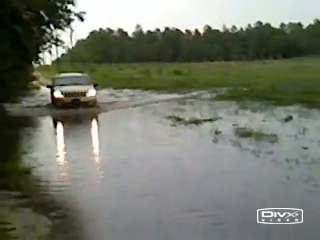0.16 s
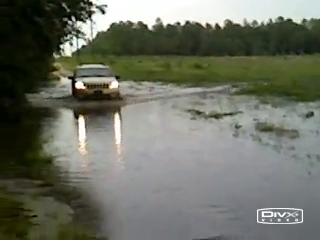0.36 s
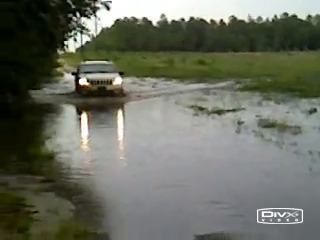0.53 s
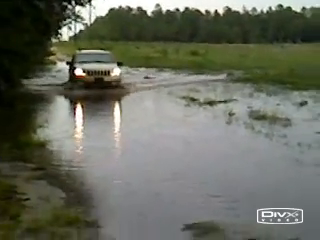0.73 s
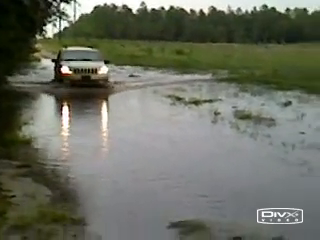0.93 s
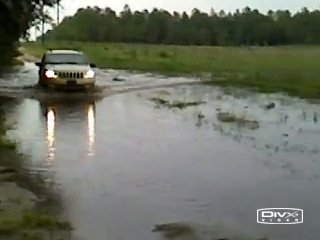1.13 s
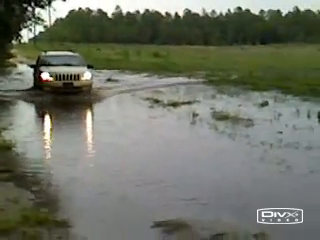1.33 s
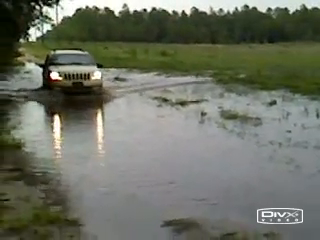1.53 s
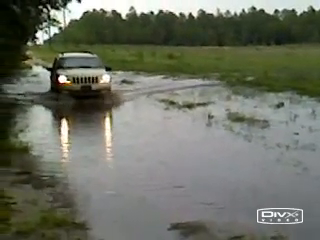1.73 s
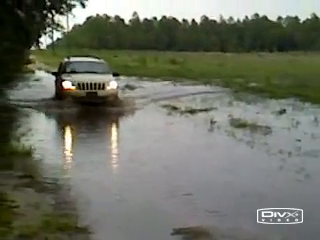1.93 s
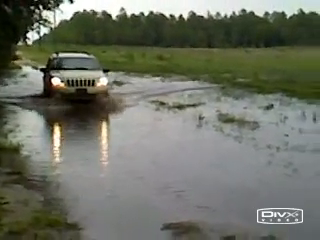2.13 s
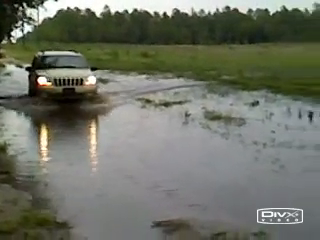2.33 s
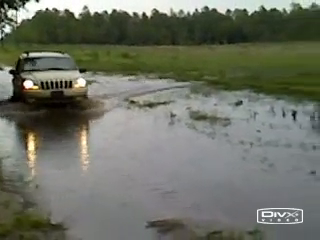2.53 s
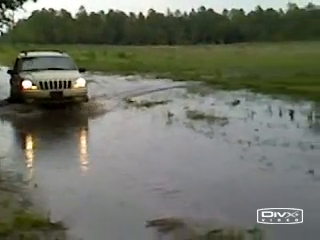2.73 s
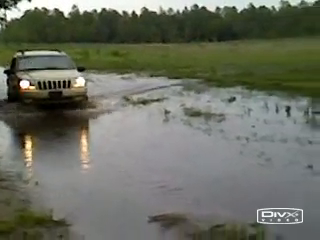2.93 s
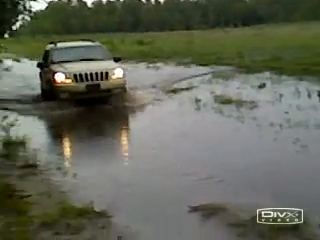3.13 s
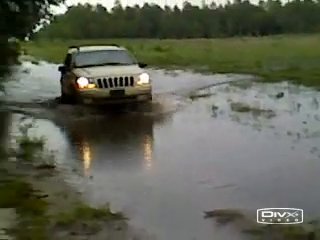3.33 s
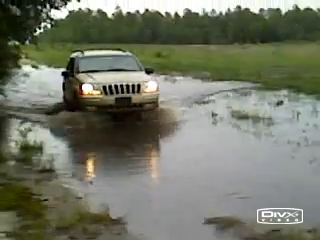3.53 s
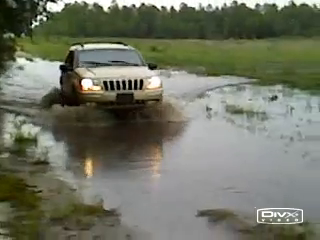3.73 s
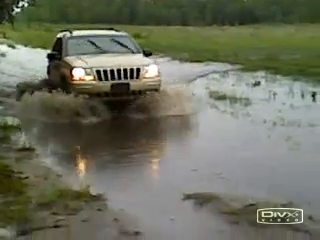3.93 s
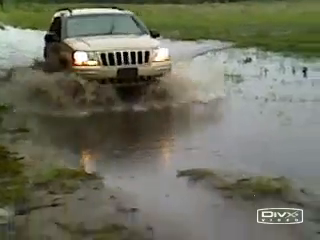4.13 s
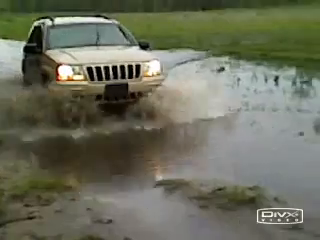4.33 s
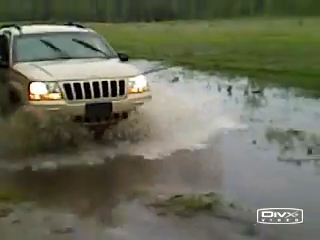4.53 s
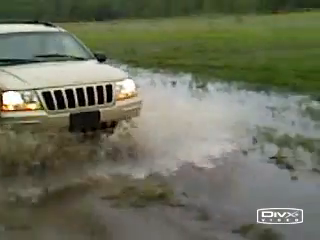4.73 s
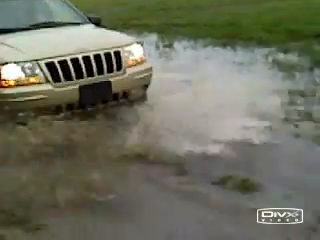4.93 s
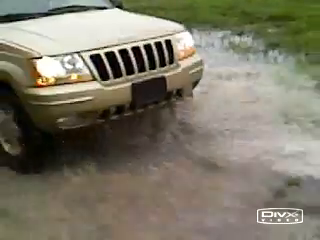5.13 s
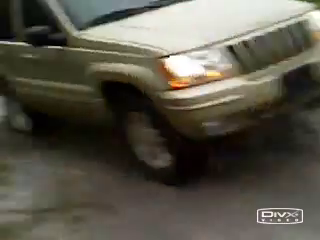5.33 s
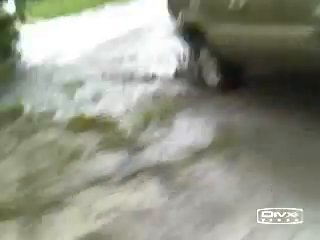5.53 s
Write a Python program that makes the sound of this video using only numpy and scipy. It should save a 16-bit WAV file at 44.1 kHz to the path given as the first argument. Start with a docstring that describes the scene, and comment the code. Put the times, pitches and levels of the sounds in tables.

```python
"""A flooded dirt road: a heavy car wades toward a small camera and passes close by.
Rush, slosh and spray are noise washes with random patches and flicker, each with its own ringing bubbles.
Thrown sheets land as bursts of crackle, air pockets plop as gliding tones, the engine is lumpy low noise.
The camera keeps a narrow band and holds each sample as a step, which mirrors the sound into the treble."""
import sys
import numpy as np
from scipy import signal
from scipy.io import wavfile
from scipy.ndimage import uniform_filter1d, map_coordinates

SR = 44100
rng = np.random.default_rng(int(sys.argv[2]) if len(sys.argv) > 2 else 0)


def transcribe(signal):
    """Save signal, clipped to [-1, 1], as a 16-bit WAV file at the path in sys.argv[1]."""
    frames = np.atleast_2d(signal).T
    limited = np.clip(frames, -1, 1)
    pcm = np.round(limited * 32767).astype(np.int16)
    wavfile.write(sys.argv[1], SR, pcm)


N = 245637

# Slow levels of the approach: (time [s], bow-wave rush [dB], slosh under the body [dB],
# falling spray [dB], engine rumble [dB])
APPROACH = [(0.0, -42.5, -50, -50.5, -70), (0.7, -44, -47.5, -45.5, -67), (1.35, -41, -47.5, -44, -63.5),
            (2.0, -43.5, -50, -42, -63), (2.6, -41.5, -49, -41.5, -64), (3.15, -40.5, -48.5, -42.5, -64),
            (3.45, -39.5, -41.5, -41.5, -57), (3.75, -36.5, -37, -36, -51), (4.08, -32, -33.5, -36, -51),
            (4.35, -33.5, -35.5, -31.5, -51.5), (4.55, -34, -38, -31.5, -51), (4.75, -33, -38, -31.5, -51),
            (4.95, -30.5, -36, -32, -48.5), (5.15, -32.5, -37.5, -27.5, -52),
            (5.35, -32.5, -38, -30.5, -52.5), (5.57, -32, -40, -27, -61)]
# Brief swells and dips in level: (time [s], rush [dB], slosh [dB], spray [dB], rumble [dB])
SWELLS_AND_DIPS = [(1.68, -5, 3.5, -1, 6), (3.04, -4, 2, 2.5, -4), (3.38, -0.5, -0.5, 1.5, 3),
                   (3.79, -0.5, 3, 0, -3), (4.1, -1, 0, 2, 0), (4.37, 3, -0.5, 0, 1), (4.63, 2, 1, 0, 5),
                   (4.94, -1, 4, 1.5, 6), (5.12, 0.5, 4, 1, 1), (5.29, 0.5, 9, 4, 7.5),
                   (5.518, 2, 3, -3.5, 2)]
# Closeness of the car: (time [s], nearness [0 far - 1 close])
CLOSENESS = [(0, .02), (3.2, 0.38), (3.7, 0.24), (5.0, 1), (5.57, 0.87)]
# Tone of the slosh: (time [s], depth [0 shallow - 1 deep])
SLOSH_DEPTH = [(0, .3), (1.0, .1), (3.0, 0.081), (3.6, 1), (4.3, 0.85), (5.0, 0.58), (5.57, 1)]
# Spectrum of the bow wave: (frequency [Hz], far density [dB per Hz], close density [dB per Hz])
RUSH_SPECTRUM = [(480, -24, -28), (796, -15.5, -7), (1013, -6.5, -2), (1130, -4, 0.5), (1330, 0, -2),
                 (1390, -4, 0.5), (1550, -7.5, -4.5), (1780, -11.5, -5), (2350, -21, -18.5)]
# Spectrum of water under the body: (frequency [Hz], shallow density [dB per Hz], deep density [dB per Hz])
SLOSH_SPECTRUM = [(60, -42, -34), (152, -14.5, -10.5), (230, -15.5, -6), (337, -8, 1.5), (550, -2, -1),
                  (588, -5.5, 0), (900, -29.5, -14)]
# Spectrum of falling spray, fuller close by: (frequency [Hz], far density [dB per Hz], close density [dB per Hz])
SPRAY_SPECTRUM = [(100, -42, -13), (300, -31, -13), (700, -4.5, -2), (1500, -1.5, -10.5), (1940, -5.5, 2),
                  (2160, -1, -4), (2680, 0, 1), (3000, -11, 1.5), (3615, -2.5, -3), (3900, -15, -6)]
# Sheets of thrown water landing: (time [s], level [dB], t60 [s], lowest frequency [Hz], highest frequency [Hz])
WATER_SHEETS = [(.29, -42.5, 0.44, 1500, 3280), (1.65, -34, 0.35, 700, 2350), (1.69, -37.5, 0.5, 202, 1200),
                (2.3, -37, 0.2, 700, 2800), (3.02, -36, 0.24, 400, 2000), (3.8, -38, 0.35, 900, 3000),
                (4.61, -29, 0.85, 300, 2500), (4.87, -30, .3, 1500, 3530), (5.295, -30, 0.48, 250, 3300),
                (5.421, -29, 0.3, 900, 3370)]
# Large air pockets ringing as they burst: (time [s], pitch [Hz], level [dB], glide [share of pitch])
AIR_POCKETS = [(1.411, 490, -42, -0.031), (1.683, 252, -44, .01), (3.493, 1382, -36.5, 0.044),
               (3.77, 205, -39, .05), (3.812, 1434, -29.5, .07), (3.918, 350, -34, -0.012),
               (4.032, 475, -29, 0.0057), (4.103, 442, -34, 0.069), (4.366, 1404, -30.5, 0.029),
               (4.415, 340, -31, 0.041), (4.44, 1340, -31, -0.053), (4.618, 1380, -32, -0.021),
               (4.646, 315, -32, .02), (4.75, 324, -35, 0.043), (4.863, 600, -33, -0.22),
               (4.865, 300, -35, 0.042), (5.032, 230, -34, -0.32), (5.092, 370, -36, 0.0075),
               (5.149, 390, -34, -0.073), (5.258, 367, -32, -.05), (5.285, 2454, -30, -.02),
               (5.343, 1134, -32.5, 0.071), (5.375, 2120, -35, 0.11), (5.415, 1190, -38, -0.16),
               (5.448, 1967, -31, -0.065), (5.52, 1190, -29, -0.039), (5.543, 1890, -34, 0.093)]
# Spectrum of the engine: (frequency [Hz], far density [dB per Hz], close density [dB per Hz])
ENGINE_SPECTRUM = [(22, -34, -30), (40, -12, 0), (65, -0.5, 3), (110, 0, 5.5), (170, 0, 7), (260, -20, -19)]

SWELL_HALF_S = 0.049
FAR_RISE_S, CLOSE_RISE_S = 0.03, 0.014  # a sheet lands more abruptly close by
PLOP_PITCH_HZ, PLOP_HALF_S = (330, 1400), (0.026, 0.04)  # high pockets ring a little longer
BAND_HZ, STEPS_PER_S, EDGE_HZ = 3900, 8000, 12780


def scene():
    """Sum of water and engine, in one channel."""
    return (wading() + splashes() + plops() + rumble())[None]


def wading():
    """Water pushed, sloshed and thrown by the car: three washes, each with its own bubbles."""
    rush = water(RUSH_SPECTRUM, patchy_db=0.97, flicker_db=0.3)
    rush += gain_of(-7) * bubbles(1126, 1455, per_s=150, cycles=14.8, spread_db=3.3)

    slosh = water(SLOSH_SPECTRUM, patchy_db=2.3, flicker_db=1.0, blend=SLOSH_DEPTH)
    slosh += gain_of(-8) * bubbles(228.8, 561.5, per_s=60, cycles=8.4, spread_db=3.4)

    spray = water(SPRAY_SPECTRUM, patchy_db=2.14, flicker_db=0.45, size=512)
    spray += gain_of(-10) * bubbles(1340, 3880, per_s=700, cycles=2.14, spread_db=3.5)
    # drips that ring longer
    spray += gain_of(-10) * bubbles(1606, 3639, per_s=200, cycles=30.5, spread_db=1.65)

    return layer_gain(1) * rush + layer_gain(2) * slosh + layer_gain(3) * spray


def water(spectrum, patchy_db, flicker_db, size=1024, blend=CLOSENESS):
    """Random short-time spectra: loud and soft patches, and a random flicker in overall level."""
    hop = size // 4
    frames = N // hop + 5
    hz = np.fft.rfftfreq(size, 1 / SR)
    real, imaginary, patches = rng.standard_normal((frames, len(hz), 3)).T

    patches = uniform_filter1d(patches, size=7, axis=0)  # across frequency
    patches = evened(uniform_filter1d(patches, size=8, axis=1))  # across time
    flicker = evened(uniform_filter1d(rng.standard_normal(frames), size=4))

    table_hz, first_db, second_db = np.transpose(spectrum)
    first_db = np.interp(np.log(hz + 1), np.log(table_hz), first_db)[:, None]
    second_db = np.interp(np.log(hz + 1), np.log(table_hz), second_db)[:, None]
    mix = np.interp(np.arange(frames) * hop / SR, *np.transpose(blend))
    colour = gain_of(first_db + mix * (second_db - first_db)) * (hz < BAND_HZ)[:, None]
    colour /= np.linalg.norm(colour, axis=0)  # blending changes tone, not power

    unevenness = gain_of(patchy_db * patches + flicker_db * flicker)
    spectra = (real + 1j * imaginary) * colour * unevenness
    return evened(signal.istft(spectra, nperseg=size, noverlap=size - hop)[1][:N])


def bubbles(low_hz, high_hz, per_s, cycles, spread_db, count=24):
    """Many small bubbles, each a short ring that rises in pitch; a few are large."""
    strength = gain_of(spread_db * np.minimum(rng.exponential(1, N), 3.5))
    strikes = strength * (rng.random(N) < per_s / SR)
    kind = rng.integers(0, count, N)
    out = np.zeros(N)
    for k, hz in enumerate(np.geomspace(low_hz, high_hz, count)):
        u = np.arange(0, 4, hz / (cycles * SR))  # one unit spans the given cycles
        tone = np.sin(2 * np.pi * cycles * (u + 0.0254 * u ** 2))
        ring = u * np.exp(-2 * u) * tone
        out += signal.oaconvolve(strikes * (kind == k), ring / np.linalg.norm(ring))[:N]
    return evened(out)


def splashes():
    """Each sheet is a wide burst of crackle that swells quickly and rains out."""
    out, t = np.zeros(N), np.arange(N) / SR
    noise = rng.standard_normal(N)
    grain = evened(uniform_filter1d(rng.standard_normal(N), size=80))
    crackle = noise * gain_of(3.4 * grain)
    for time_s, db, t60_s, low_hz, high_hz in WATER_SHEETS:
        near = np.interp(time_s, *np.transpose(CLOSENESS))
        rise_s = FAR_RISE_S + (CLOSE_RISE_S - FAR_RISE_S) * near
        rise = np.exp(-((t - time_s) / rise_s) ** 2)
        decay = gain_of(-60 * np.maximum(t - time_s, 0) / t60_s)
        swell = np.where(t < time_s, rise, decay)
        band = signal.butter(2, [low_hz, high_hz], "bandpass", fs=SR, output="sos")
        out += gain_of(db) * swell * evened(signal.sosfilt(band, crackle))
    return out


def plops():
    """Each trapped air pocket swells and dies as one gliding tone."""
    out, t = np.zeros(N), np.arange(N) / SR
    start_cycles = rng.random(len(AIR_POCKETS))
    for (time_s, hz, db, glide), start in zip(AIR_POCKETS, start_cycles):
        half_s = np.interp(hz, PLOP_PITCH_HZ, PLOP_HALF_S)
        span = slice(round((time_s - half_s) * SR), round((time_s + half_s) * SR))
        u = (t[span] - time_s) / half_s  # -1 to 1
        tone = np.sin(2 * np.pi * (hz * half_s * (u + glide * u ** 2 / 2) + start))
        swell = np.cos(np.pi * u / 2) ** 2
        out[span] += gain_of(db) * np.sqrt(2) * swell * tone
    return out


def rumble():
    """The drowned engine is a lumpy low noise."""
    return layer_gain(4) * water(ENGINE_SPECTRUM, patchy_db=0.8, flicker_db=0.62, size=4096)


def layer_gain(column):
    """Gain of one layer: the slow approach plus brief bell-shaped swells and dips in dB."""
    t = np.arange(N) / SR
    slow, brief = np.transpose(APPROACH), np.transpose(SWELLS_AND_DIPS)
    brief_db = np.zeros(N)
    for time_s, db in zip(brief[0], brief[column]):
        brief_db += db * np.exp(-((t - time_s) / SWELL_HALF_S) ** 2)
    return gain_of(np.interp(t, slow[0], slow[column]) + brief_db)


def record(dry):
    """Camera: narrow band without deep bass, samples held as steps, then the band limit."""
    thin = signal.sosfilt(signal.butter(4, 36, "high", fs=SR, output="sos"), dry)
    narrow = low_pass(thin, BAND_HZ, count=1501)
    ticks = np.arange(N * STEPS_PER_S // SR + 1) * SR / STEPS_PER_S
    samples = map_coordinates(narrow[0], [ticks], order=3, mode="nearest")
    # the steps mirror the band around each multiple of their rate
    held = samples[np.arange(N) * STEPS_PER_S // SR]
    return low_pass(held[None], EDGE_HZ, count=1001)


def gain_of(db):
    """Decibels to amplitude gain."""
    return 10 ** (np.asarray(db) / 20)


def evened(x):
    """Scales to rms 1."""
    return x / np.sqrt(np.mean(x ** 2) + 1e-20)


def low_pass(x, hz, count):
    """Steep linear-phase low-pass with count taps."""
    taps = signal.firwin(count, hz, window=("kaiser", 9), fs=SR)
    return signal.oaconvolve(x, taps[None], "same")


dry = scene()
out = record(dry)
transcribe(out)
```